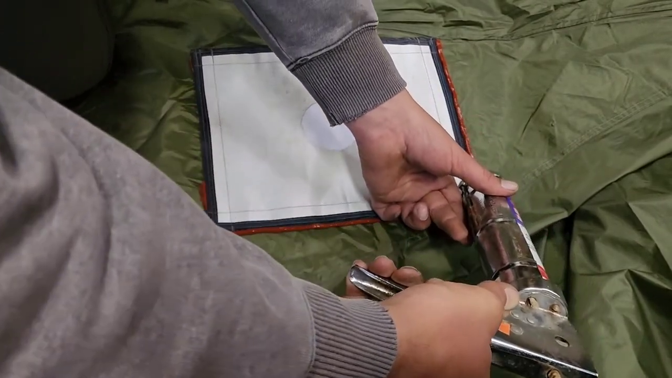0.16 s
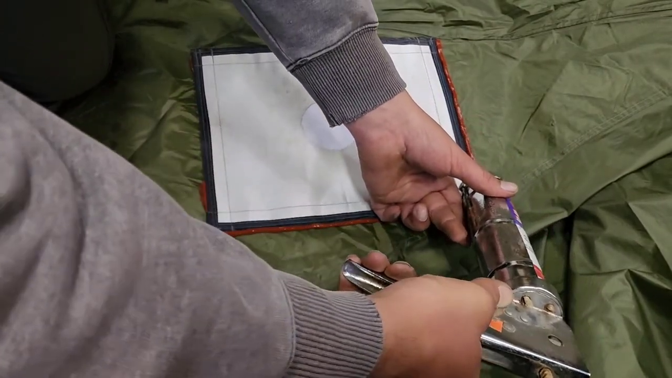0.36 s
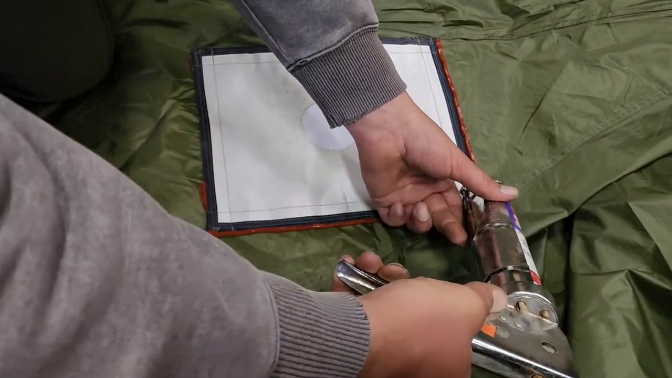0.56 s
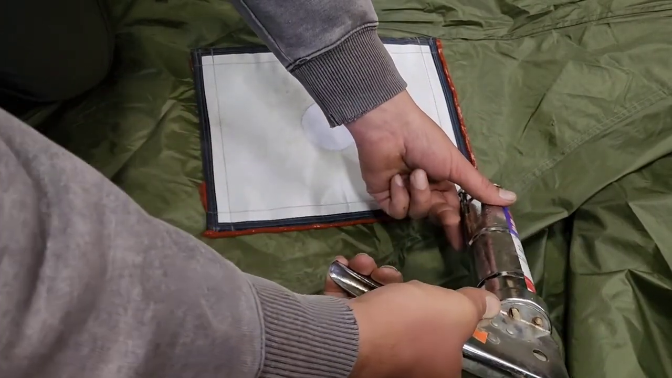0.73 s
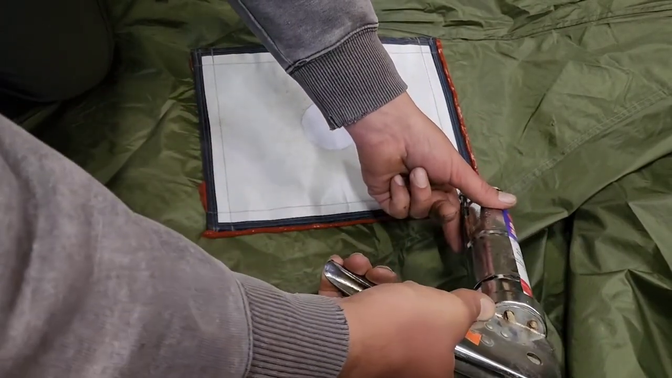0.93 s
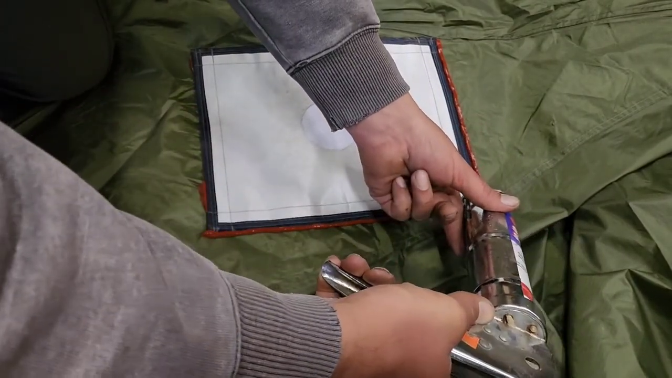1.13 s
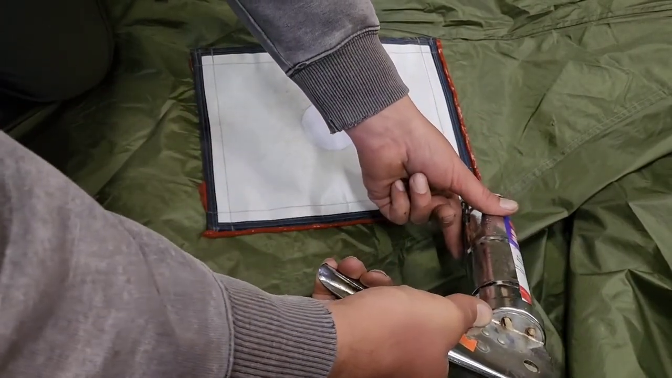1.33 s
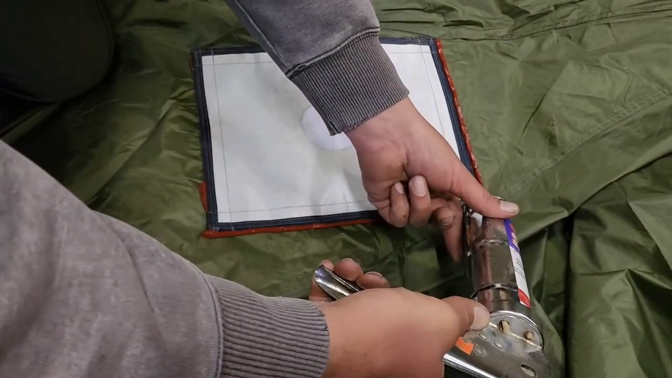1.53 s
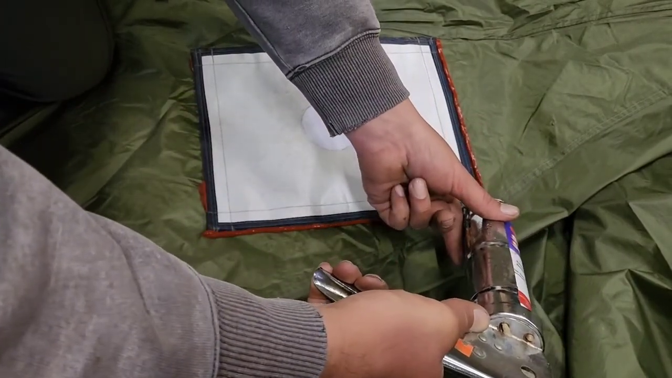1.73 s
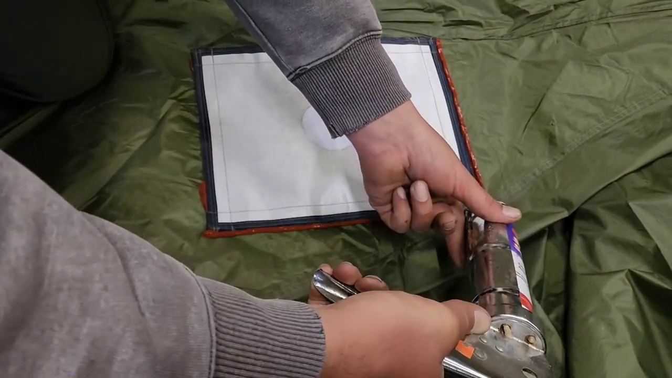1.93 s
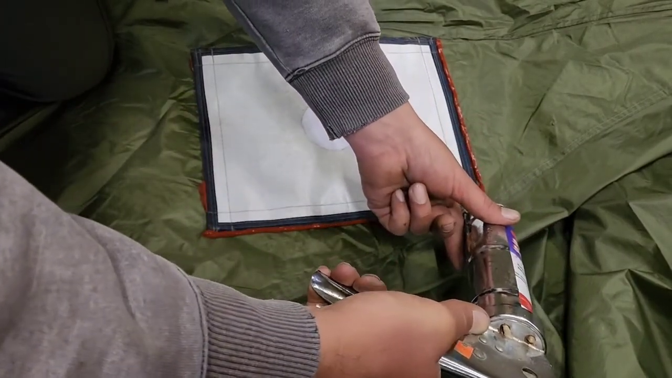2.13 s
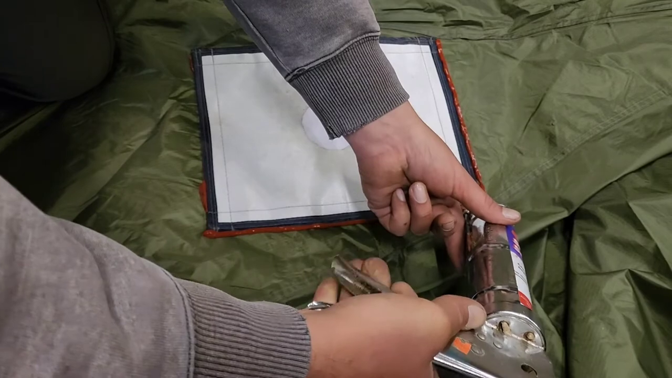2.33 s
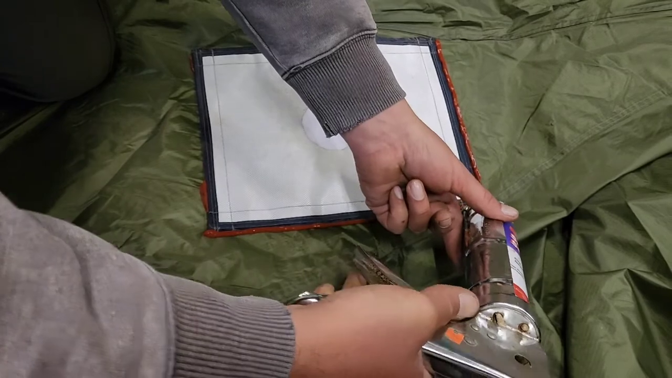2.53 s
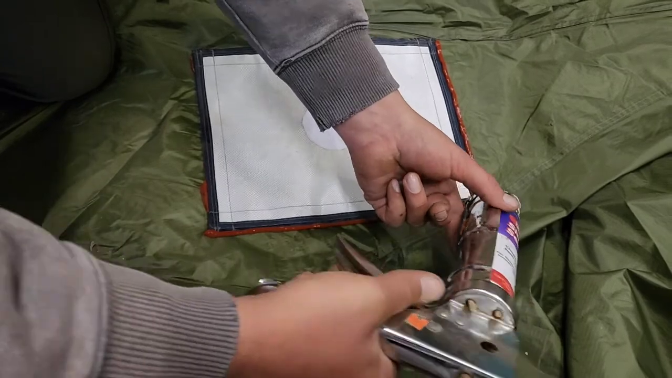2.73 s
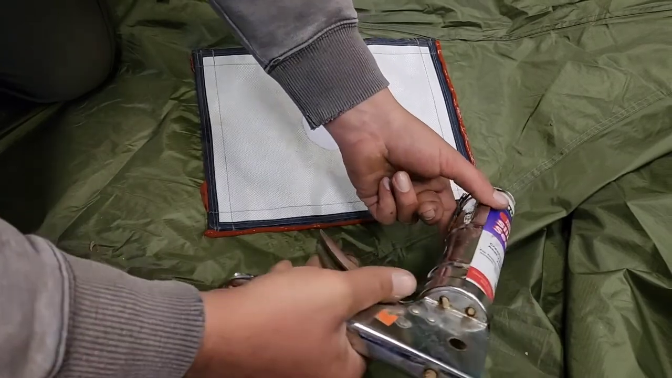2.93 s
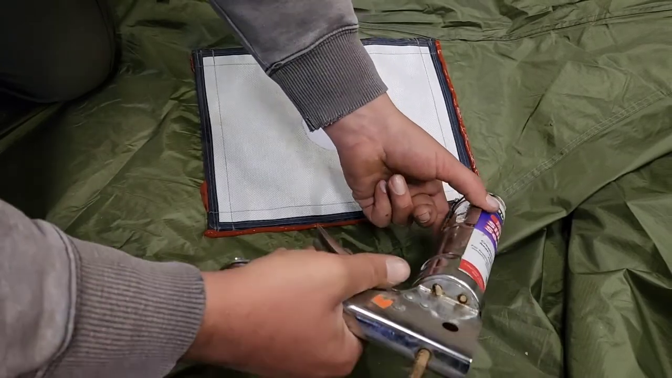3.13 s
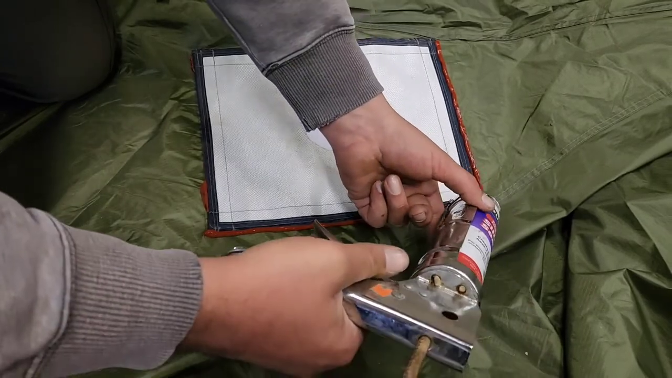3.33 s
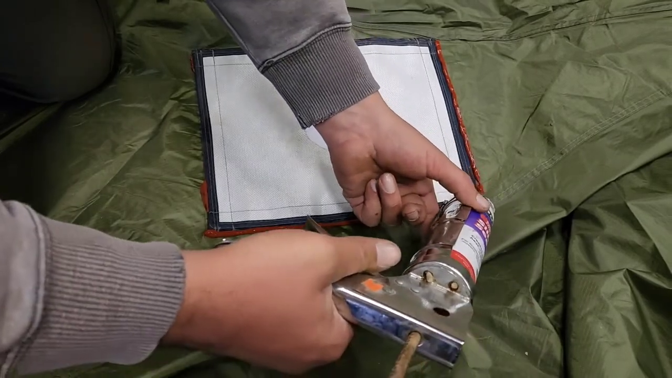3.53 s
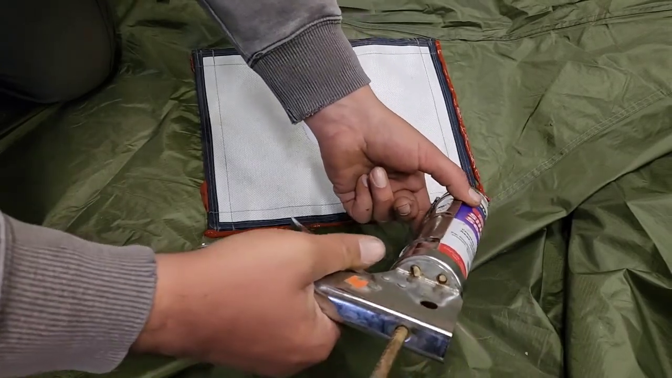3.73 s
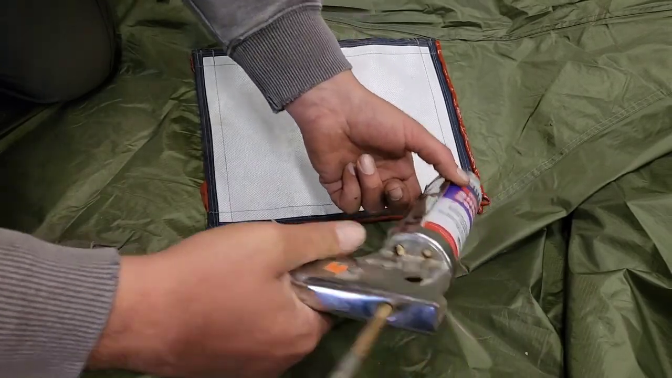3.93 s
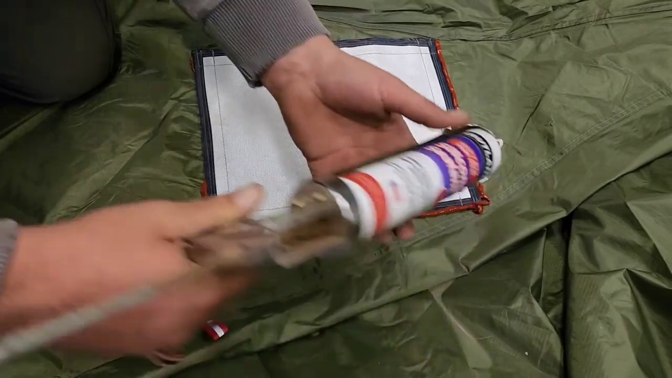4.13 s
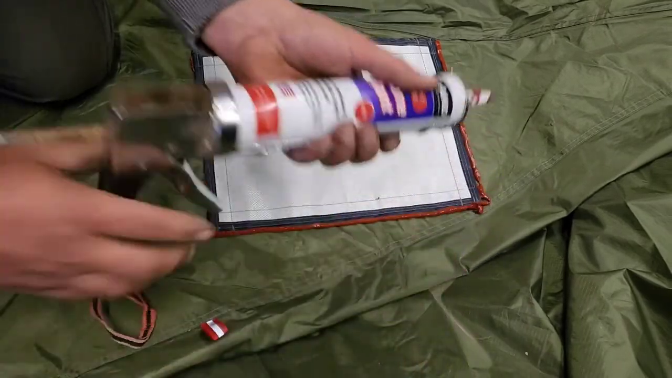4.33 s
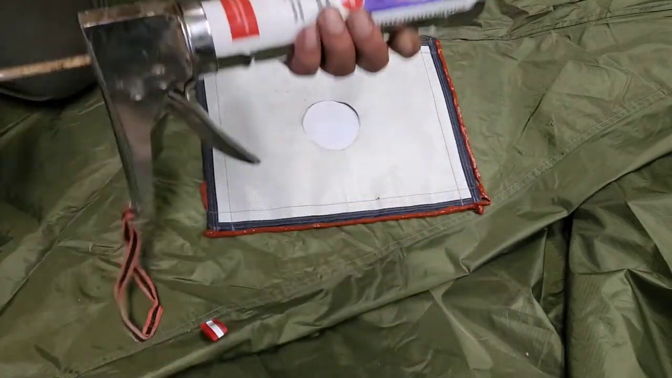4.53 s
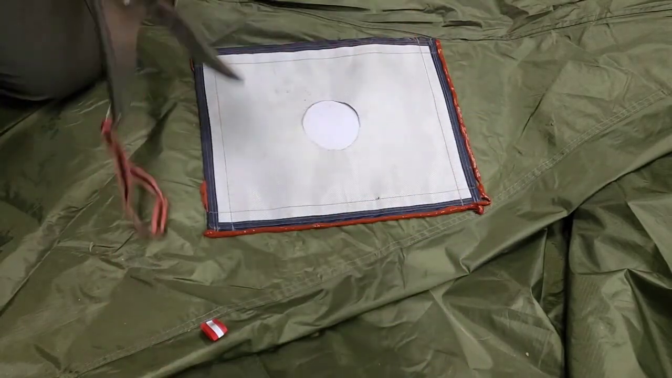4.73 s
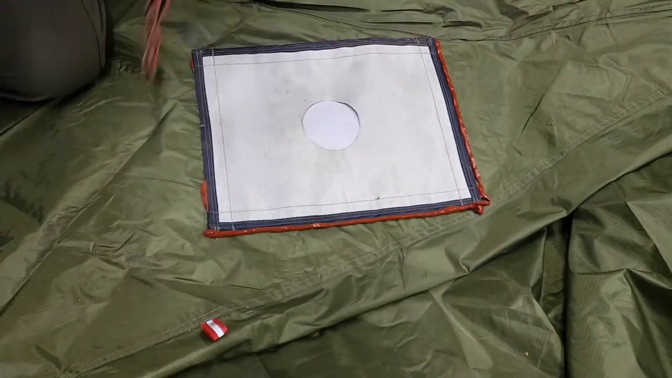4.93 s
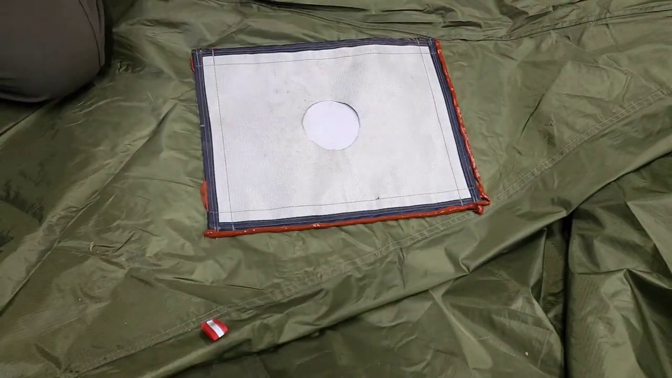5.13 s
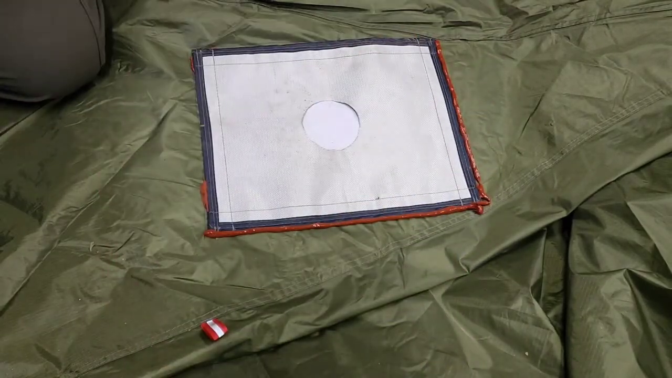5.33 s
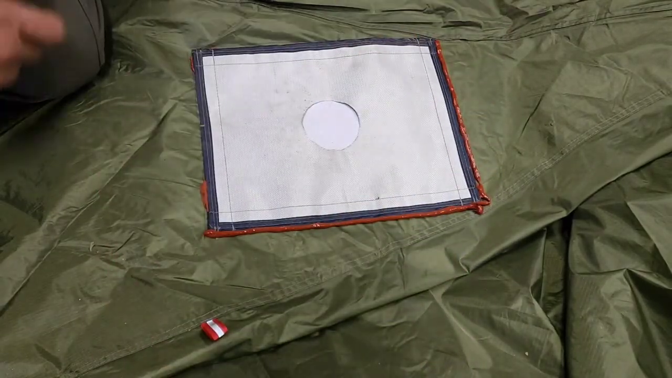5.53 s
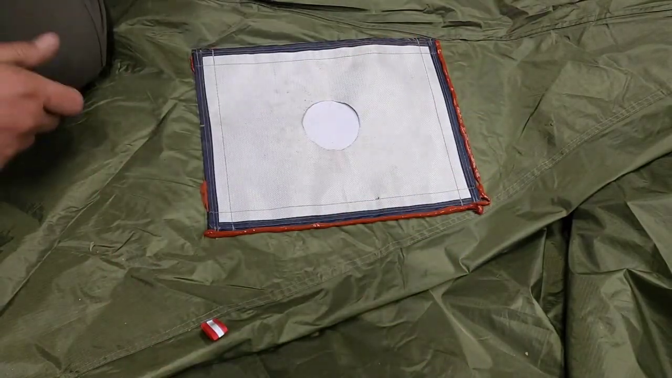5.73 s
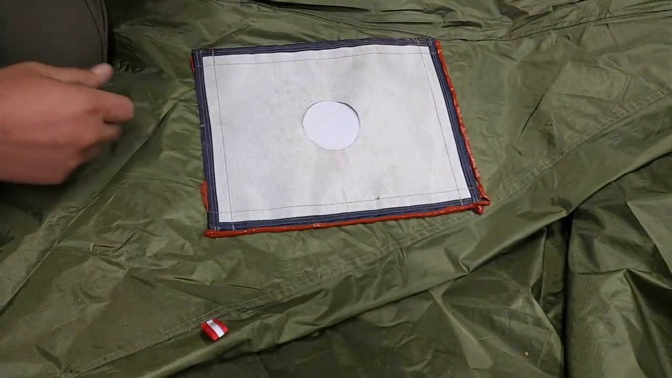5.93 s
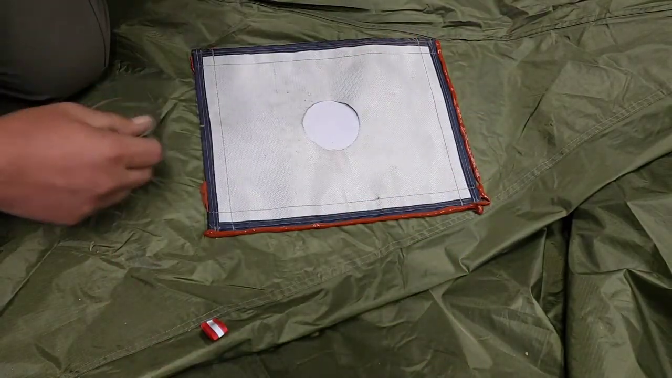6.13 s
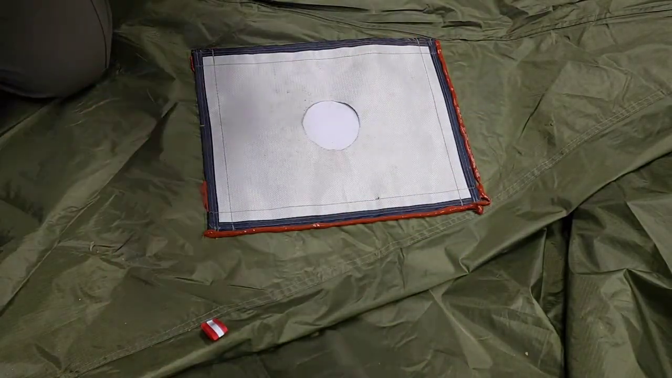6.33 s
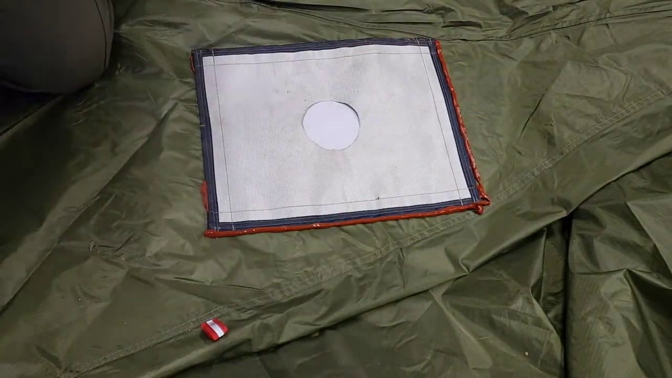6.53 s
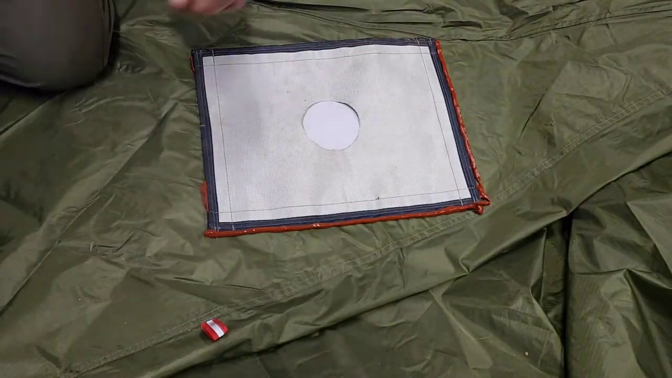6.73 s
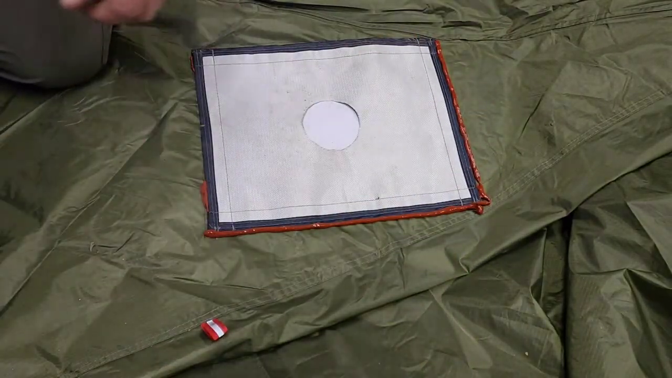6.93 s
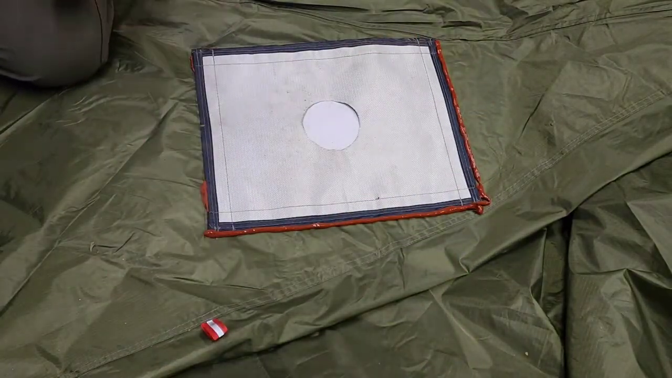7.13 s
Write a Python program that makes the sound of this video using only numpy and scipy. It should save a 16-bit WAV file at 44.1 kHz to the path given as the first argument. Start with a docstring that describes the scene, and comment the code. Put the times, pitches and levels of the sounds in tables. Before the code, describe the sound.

A constant low, slightly wavering machine hum with a faint far hiss lies under everything. From 0 to 0.8 seconds sleeves rustle and scrape lightly, with barely audible metal ticks around 0.3 to 0.5. It is then almost only hum until about 2.15, when the dragging steel plate gives a tiny creak and rising squeak, ending at 2.38 in the loudest event, a bright, dry steel snap with a short echo. Hum alone again until cloth stirs near 4.0. A hollow knock at 4.19 begins a loose run of clicks and rattles, with a ringing clank at 4.72 to 4.8, thinning by 5.1. A fabric swish comes near 5.3. Light clicks at 5.5 lead to a heavy clatter and dull thud at 5.6 to 5.7. Afterwards there are a few faint ticks, a small snap of cloth at 6.4, and soft rubbing to the end around 7.

```python
"""A steel caulking gun is worked by hand over a spread tent: trigger, plate and rod click and ring. Chattering
contacts excite the decaying modes of the steel, decaying sines add low knocks and rings, and the dragging plate
creaks and squeaks. Hard surfaces nearby give a short echo of shaped noise. Sleeves and tent cloth rustle and
scrape as grainy noise; a distant machine hums as coloured noise with one strong wavering tone and weaker ones,
over a steady hiss."""
import sys
import numpy as np
from scipy import signal
from scipy.fft import rfft, irfft
from scipy.io import wavfile

SR = 44100
rng = np.random.default_rng(int(sys.argv[2]) if len(sys.argv) > 2 else 0)


def dump_mix(stems):
    """Bounce the given channels to the path in sys.argv[1] as a 16-bit WAV at rate SR."""
    frames = np.atleast_2d(stems).T  # one column per channel
    limited = np.clip(frames, -1, 1)  # hard clip at full scale
    pcm = np.round(limited * 32767).astype(np.int16)
    wavfile.write(sys.argv[1], SR, pcm)


N = 316197  # samples

# Steel contacts: start_s, relative peak_db, frame knock_db, sizzle_db, first_part_hz, second_part_hz
# (pitches of the parts that meet), ring_db (low where the hand damps it), chatter_ms
CONTACTS = [(0.301, -64.5, 3.5, -14, 1290, 7450, -8.5, 12), (0.4915, -59, -9, 0, 7900, 5370, -2, 9.1),
            (0.5005, -57.5, -2, 4, 7440, 5370, -8, 3.2), (0.808, -71, -3, -30, 8750, 8150, 4.5, 4.7),
            (1.284, -87.5, -20, -27, 8900, 8150, 10.5, 8.2), (2.1805, -61.5, 5, 0, 1800, 7450, 0.5, 4.2),
            (2.261, -54.5, 3, 6, 2000, 7450, -9, 7.9), (2.2862, -56, 7.5, 2, 1990, 3280, 2.5, 6.7),
            (2.295, -51, -11, -1, 1910, 4515, -2, 10.4), (2.3772, -19, -4.5, 5, 1487, 2000, -10, 8.2),
            (2.3922, -37, 1.5, -15.5, 2060, 1487, -8.5, 8.2),
            (4.0504, -41.5, -15.5, 4.5, 3000, 3217, 1, 7.3), (4.135, -52.5, -16, -2, 8950, 14200, -12, 23),
            (4.1685, -47.5, -5, -0.5, 7600, 14200, -4, 8.2), (4.2615, -53.5, -5, 2, 6400, 12150, -10, 8.3),
            (4.2945, -50.5, -15, -6, 4560, 7450, -11, 6.2), (4.347, -38, -19, -2, 4910, 2960, -14, 9),
            (4.3635, -34.5, -8.5, 8, 4890, 3635, -2.5, 4.2), (4.4775, -39, -15, 8.5, 3643, 4910, -3.5, 8.2),
            (4.492, -44, -14, 6, 4840, 3635, 1.5, 14.5), (4.5177, -67, 19, -11, 1790, 1970, 0, 7.9),
            (4.548, -34.5, -13.5, 5, 7460, 3230, -8.5, 4.4), (4.561, -47.5, -11, 2, 2990, 3635, -1.5, 6),
            (4.5874, -63, -21, 19.5, 7500, 8150, 0.5, 6.3), (4.631, -53.5, -18, 4.5, 4400, 3635, -15, 11),
            (4.7226, -28.5, -6.5, -6.5, 1815, 3240, -9.5, 8.9),
            (4.763, -37, -9, 0.5, 3200, 736, -0.5, 23.5), (4.7745, -35, -2.5, -9, 2040, 1800, -13, 12.6),
            (4.7826, -42.5, 4.5, 8, 2000, 1830, -1.5, 3.8), (4.805, -49.5, -16.5, -4, 1810, 4910, 0, 12),
            (4.862, -36.5, -34, -7, 6400, 3635, -20, 4.7), (4.882, -47, -51, -6, 6470, 4400, -1, 11.3),
            (4.958, -73, -13, -20, 2970, 3280, 12, 16), (4.993, -48.5, -4, -8, 1870, 3635, -15, 11),
            (5.054, -52.5, 2, -7, 1490, 2944, -8, 11.8), (5.0868, -52, -28, -15, 6350, 7450, -8, 8.2),
            (5.464, -47, -17, -2, 6400, 7450, -14, 7.2), (5.476, -42.5, -15.5, 4, 7500, 5300, -10.5, 10.5),
            (5.505, -39.5, -15, 1, 7400, 3635, -13, 17), (5.6064, -23.5, -11, 2.5, 5470, 4770, -8, 6.3),
            (5.6158, -24, -1.5, -15, 3170, 5400, -6, 5.4), (5.633, -30.5, -7, -11, 3620, 4400, -3, 7.6),
            (5.6715, -27, -1.5, -13, 1221, 1870, -4, 6.6), (5.6957, -41, 4, -6, 5480, 1825, -6, 11),
            (5.878, -55, -4.5, 3, 1209, 7450, -17, 14), (6.011, -54, -6.5, -20.5, 5250, 2530, 1.5, 6.5),
            (6.1085, -55, -15, -0.5, 7400, 6400, -9, 5.2), (6.487, -60.5, -6.5, -13, 3635, 1990, -12, 7.6)]
# Drag of the release plate along the rod: time_s, relative level_db
PLATE_DRAG = [(2.14, -99.5), (2.175, -77), (2.2, -74), (2.25, -66.5), (2.29, -57), (2.33, -64.5),
              (2.373, -47.5), (2.39, -97.5)]
# Stereo place of the gun's body: time_s, left_minus_right_db
BODY_PAN = [(2.4, 4), (4.55, 5), (4.72, 4)]
# Coherence of diffuse sound between the two ports: frequency_hz, likeness (1 = identical)
PORT_LIKENESS = [(60, 0.96), (180, 0.98), (550, 0.49), (1650, 0.0092), (4970, 0.015), (15000, 0.012)]


def contacts():
    """Impact chatter: each contact is a swelling, decaying burst of ticks in five registers."""
    # Lead of the left port, which the gun is nearer: below and above 2.5 kHz [s]
    port_lag_s = [.0001, .00022]
    thud_db, middle_db, sizzle_pan_db = -13, -3, -2.1  # thud re knock; pan is left minus right
    registers_hz = [(300, 1000), (1250, 2360), (2600, 8430), (6000, 10000), (10500, 17500)]
    lags = np.round(np.array(port_lag_s)[[0, 0, 1, 1, 1]] * SR).astype(int)
    t = np.arange(round(.08 * SR)) / SR
    shape = (len(CONTACTS), 2, len(t))  # two rows: neighbouring registers get unrelated ticks
    ticks = rng.standard_normal(shape) * from_db(2.8 * rng.standard_normal(shape))
    bursts = []
    for tick, (start_s, peak_db, knock_db, sizzle_db, *_, chatter_ms) in zip(ticks, CONTACTS):
        length_s = chatter_ms / 1000  # time to decay by 20 dB
        swell = np.minimum(t / (0.38 * length_s), 1)
        burst = tick * swell * from_db(-20 * t / length_s)
        parts = np.array([band(band(burst[k % 2], *edges), *edges)
                          for k, edges in enumerate(registers_hz)])
        parts = parts / np.sqrt(np.sum(parts ** 2, 1, keepdims=True) / (length_s * SR / 4))
        levels_db = peak_db + np.array([knock_db + thud_db, knock_db, middle_db, middle_db, sizzle_db])
        body_pan_db = np.interp(start_s, *np.transpose(BODY_PAN))
        pans_db = np.array([body_pan_db] * 3 + [sizzle_pan_db] * 2)
        late = np.array([np.roll(part, lag) for part, lag in zip(parts, lags)])
        left = from_db(levels_db + pans_db / 2) @ parts
        right = from_db(levels_db - pans_db / 2) @ late
        bursts.append([left, right])
    return np.array(bursts)


def lay_out(bursts, gains_db):
    """Superposition: each burst is added at its moment with a gain of its own."""
    out = np.full((2, N + bursts.shape[2]), 1e-18)
    for burst, row, gain in zip(bursts, CONTACTS, from_db(gains_db)):
        at = round((row[0] - .001) * SR)  # the swell begins 1 ms ahead
        out[:, at:at + burst.shape[1]] += gain * burst
    return out[:, :N]


def evenness_db(bursts, hz):
    """Spectral evening: gain (at most 15 dB) bringing a noise burst's power at a mode to the local mean."""
    power, step_hz = np.sum(np.abs(rfft(bursts, 4096)) ** 2, 1) + 1e-20, SR / 4096
    around = power[:, int(.85 * hz / step_hz):int(1.15 * hz / step_hz)].mean(1)
    return np.minimum(10 * np.log10(around / power[:, round(hz / step_hz)]), 15)


def steel(bursts):
    """Modal synthesis: chatter and stick-slip drag drive a bank of damped two-pole resonators."""
    # Modes of the steel frame and rod: frequency_hz, relative level_db, t60_s (held to 0.01 or more)
    steel_modes = [(517, -14.5, 0.087), (734, -5, 0.22), (1179, 2.5, 0.036), (1265, -7, 0.11),
                   (1478, -15.5, 0.12), (1797, -20, 0.17), (2040, -11.5, 0.054), (2500, -16.5, 0.11),
                   (3012, -8.5, .05), (3101, -9.5, .04), (3647, -13, 0.055), (4400, -17, 0.05),
                   (5000, -9, 0.06), (5370, -10, 0.048), (6447, -8.5, 0.071), (7450, -9, 0.03),
                   (7990, -3, 0.014), (8850, -6, 0.0079), (11900, -11, 0.052), (12900, -12.5, 0.036),
                   (13700, -14.5, 0.05), (15300, -9.5, 0.044), (15200, -9.5, .06)]
    ring_level_db, drag_ring_db = -1, -3
    mode_spread_db = 2  # random spread of each mode's share from contact to contact
    near_boost_db, near_octaves = 12.5, 0.05  # modes close to the parts struck ring loudest
    ring_db, struck_hz = np.array(CONTACTS)[:, 6], np.array(CONTACTS)[:, 4:6]
    slips = rng.standard_normal((2, N)) * from_db(in_time(PLATE_DRAG)[0] + 0.87 * drift(120))
    slips = band(slips, 1800, 5300)
    out = 0
    for k, (hz, level_db, t60_s) in enumerate(steel_modes):
        r, w = from_db(-60 / (max(t60_s, .01) * SR)), 2 * np.pi * hz / SR  # pole radius and angle
        octaves_off = np.log2(struck_hz / hz)
        near_db = near_boost_db * np.exp(-(octaves_off / near_octaves) ** 2).max(axis=1)
        share_db = mode_spread_db * rng.standard_normal(len(CONTACTS))
        gains_db = level_db + ring_db + near_db + evenness_db(bursts, hz) + share_db
        drive = lay_out(bursts, gains_db) + from_db(level_db + drag_ring_db) * slips
        mode = signal.lfilter([0, 0.04 * np.sin(w)], [1, -2 * r * np.cos(w), r * r], drive)
        out = out + (-1) ** k * mode  # alternate polarity
    return from_db(ring_level_db) * out


def creak(rough_db=2.5):
    """Stick-slip friction: the dragging plate gives a broad noise creak and a rising squeak."""
    creak_db, squeak_db = -2, -9  # against the drag level
    squeak_hz, squeak_rise_hz_per_s = 2840, 3200
    elapsed_s = np.clip(np.arange(N) / SR - PLATE_DRAG[1][0], 0, .3)
    broad = rms_one(band(band(rng.standard_normal(N), 1100, 2100), 1100, 2100))
    phase = 2 * np.pi * np.cumsum(squeak_hz + squeak_rise_hz_per_s * elapsed_s) / SR
    squeak = np.minimum(elapsed_s / 0.17, 1) * drift(65) * np.sin(phase)
    slips = from_db(in_time(PLATE_DRAG)[0] + rough_db * drift(40))
    pan = from_db([[BODY_PAN[0][1] / 2], [-BODY_PAN[0][1] / 2]])
    return slips * (from_db(creak_db) * broad + from_db(squeak_db) * squeak) * pan


def knocks():
    """Damped oscillation: each knock or low ring is one exponentially decaying sine."""
    # Low knocks, and low rings of the struck gun: start_s, relative peak_db, pitch_hz,
    # cycles (to fall 60 dB; the sound ends after 0.1 s at the latest)
    blows = [(2.379, -39, 760, 20), (4.1889, -26.5, 906, 9.5), (4.364, -43.5, 1293, 74),
             (4.478, -48.5, 1320, 72), (4.5177, -42, 627, 13), (4.7226, -40, 783, 55),
             (4.769, -33, 758, 52), (4.747, -43, 510, 72), (4.766, -38, 503.5, 103),
             (4.995, -45.5, 733, 39), (5.608, -34.5, 670, 14), (5.675, -23.5, 416, 5),
             (5.691, -30.5, 262, 8), (5.712, -38, 191, 17)]
    out, t = np.zeros(N), np.arange(SR // 10) / SR
    for start_s, peak_db, hz, cycles in blows:
        at = round(start_s * SR)
        decay = from_db(peak_db - 60 * t * hz / cycles)
        out[at:at + len(t)] += decay * np.sin(2 * np.pi * hz * t)
    return out


def echo(x):
    """Diffuse reverberation: convolution with noise, unrelated at the ports, decaying band by band."""
    # Reverberation time of the surroundings: frequency_hz, t60_s
    reverb_time = [(400, 0.42), (1500, 0.33), (5000, 0.37), (12000, 0.22)]
    t, edges = np.arange(SR // 2) / SR, np.geomspace(200, 18000, 9)
    white = rng.standard_normal((2, 2, len(t)))
    tail = 0
    for k, (low, high) in enumerate(zip(edges, edges[1:])):
        decay = from_db(-60 * t / at_hz(reverb_time, np.sqrt(low * high)))
        tail = tail + band(white[k % 2], low, high) * decay
    tail = tail * np.clip(t / 0.006 - .5, 0, 1)  # builds up between 3 and 9 ms
    return signal.fftconvolve(x, tail / np.sqrt(np.sum(tail ** 2) / 2), axes=1)[:, :N]


def microphone(x):
    """Port resonance: a cascade of second-order peaks and dips colours close sounds."""
    # Peaks and dips of the ports: frequency_hz, width_hz, gain_db
    port_peaks = [(6020, 1600, 1), (9210, 1100, -11), (11200, 9300, 12.5), (2857, 1920, 10.5)]
    for hz, width_hz, gain_db in port_peaks:
        w, g = 2 * np.pi * hz / SR, from_db(gain_db / 2)
        a = np.pi * width_hz / SR
        x = signal.lfilter([1 + a * g, -2 * np.cos(w), 1 - a * g],
                           [1 + a / g, -2 * np.cos(w), 1 - a / g], x)
    return x


def rubbing_levels(drag_hiss_db=3.5, drag_depth_db=-1.5):
    """Power addition: steady rubbing, swishes and the plate's dry hiss; gains above and below the split."""
    # Swishes of sleeve and cloth: start_s, hold_s, relative level_db,
    # depth_db (low band against high, capped at 8)
    swishes = [(0.015, 0.13, -73.5, -2), (0.156, 0.16, -71.5, 7.5), (0.428, 0.025, -60, 3),
               (0.463, 0.045, -57, -3), (0.587, 0.054, -65.5, -4), (0.655, 0.038, -73.5, 4),
               (0.77, 0.21, -86, 15), (2.62, 0.23, -85.5, 11.5), (3.966, 0.056, -65, -7),
               (4.016, 0.043, -59.5, 2), (4.148, 0.043, -57, 2), (4.684, 0.18, -56.5, 8.5),
               (5.003, 0.038, -59.5, 10), (5.13, 0.15, -67, 10), (5.276, 0.094, -53.5, -3.5),
               (5.93, 0.023, -71, -7), (6.402, 0.014, -54.5, -4)]
    # Steady rubbing, stronger once the gun is lifted and the hands move on: time_s,
    # relative level_db, depth_db (as above)
    rubbing = [(0, -100, -3), (3.86, -98, -2), (3.96, -64, -6), (4.4, -70.5, 8), (4.9, -67, 16),
               (5.3, -72.5, 10), (5.6, -62.5, 14.5), (6.2, -67.5, 6), (6.4, -61, 7), (6.7, -63, 5.5),
               (6.92, -67, 3.5), (7.17, -63, 0.5)]
    rise_db_per_s, fall_db_per_s = 348, 446
    t = np.arange(N) / SR
    layers = [in_time(rubbing), (in_time(PLATE_DRAG)[0] + drag_hiss_db, drag_depth_db)]
    for start_s, hold_s, peak_db, depth_db in swishes:
        rise_db = rise_db_per_s * np.maximum(start_s - t, 0)
        fall_db = fall_db_per_s * np.maximum(t - start_s - hold_s, 0)
        layers.append((peak_db - rise_db - fall_db, depth_db))
    high = sum(from_db(2 * level) for level, _ in layers)
    low = sum(from_db(2 * (level + np.minimum(depth, 8))) for level, depth in layers)
    return np.sqrt(high), np.sqrt(low)


def rustle(grain_db=1.5, patchy_db=0.7, own_db=2.2, snap_db=1.5, split_hz=3200):
    """Fibre friction: noise in uneven grains and snaps, each register swelling and thinning on its own."""
    # Spectrum of rubbed cloth: frequency_hz, relative density_db (per Hz)
    cloth_spectrum = [(530, -31.5), (900, -8), (1050, -8), (1610, -7), (2500, -13.5), (3600, -13),
                      (5600, -10.5), (7410, -3.5), (9330, -14), (12300, -5.5), (15000, -2.5), (16300, -15)]
    high_gain, low_gain = rubbing_levels()
    snaps_db = snap_db * np.repeat(rng.exponential(1, N // 40 + 1), 40)[:N]  # same at both ports
    grains = rng.standard_normal((2, N))
    grains = grains * from_db(grain_db * drift(150) + patchy_db * drift(13.0) + snaps_db)
    coloured, edges = shaped(grains, cloth_spectrum), np.geomspace(500, 18000, 9)
    cloth = 0
    for k in range(8):
        cloth = cloth + (-1) ** k * from_db(own_db * drift(20.0)) * band(coloured, *edges[k:k + 2])
    cloth = rms_one(cloth)
    low = signal.sosfilt(signal.butter(4, split_hz, "low", fs=SR, output="sos"), cloth)
    high = signal.sosfilt(signal.butter(4, split_hz, "high", fs=SR, output="sos"), cloth)
    return high_gain * high + low_gain * low


def scrapes():
    """Resonant friction: grainy noise in one narrow band swells and fades."""
    # Low scrapes of a sleeve on stretched cloth: start_s, length_s, level_db (before the fade),
    # reference_hz (the band spans 0.92 to 0.96 of it)
    sleeve_scrapes = [(0.412, 0.073, -60.5, 1290), (6.309, 0.2, -64, 1480)]
    out = np.zeros((2, N))
    for start_s, length_s, level_db, hz in sleeve_scrapes:
        at, count = round(start_s * SR), round(length_s * SR)
        grains = rng.standard_normal((2, count)) * from_db(3.0 * drift(90)[:count])
        scrape = rms_one(band(grains, 0.92 * hz, 0.96 * hz))
        out[:, at:at + count] += from_db(level_db) * scrape * np.hanning(count)
    return out


def hum():
    """Partially coherent noise: rumble and a steady hiss, with tones wavering in pitch and level."""
    # Spectrum of the rumble: frequency_hz, relative density_db (per Hz)
    rumble_spectrum = [(13, -54.5), (22, -28), (91, -8.5), (123, -4.5), (157, -7), (186, -9.5), (213, -13),
                       (310, -19.5), (370, -16.5), (444, -30), (657, -28.5), (766, -33.5), (940, -32),
                       (1300, -43), (1690, -73), (2860, -120)]
    # Spectrum of the steady hiss: frequency_hz, relative density_db (per Hz)
    hiss_spectrum = [(710, -45.5), (1200, -7), (1440, -1.5), (1920, -7.5), (2090, -8), (2660, -15.5),
                     (3800, -20), (7930, -23.5), (8750, -31), (16300, -38)]
    # Tones of the machine: frequency_hz, rms level_db, waver_db (spread), breadth_hz (spread)
    tones = [(185.1, -52, 1, 1.3), (312.2, -65, 4.5, 6), (475.7, -73, 2.5, 3.5), (645.4, -72, 3, 2.6),
             (3750, -92.5, 1.9, 8.6)]
    rumble_db, hiss_db = -51, -79
    out = from_db(rumble_db) * shaped(rng.standard_normal((2, N)), rumble_spectrum)
    out = out + from_db(hiss_db) * shaped(rng.standard_normal((2, N)), hiss_spectrum)
    for hz, level_db, waver_db, breadth_hz in tones:
        phase = 2 * np.pi * np.cumsum(hz + breadth_hz * drift(6.0)) / SR
        apart = np.arccos(np.clip(at_hz(PORT_LIKENESS, hz), -1, 1))  # phase gap between the ports
        gain = np.sqrt(2) * from_db(level_db + waver_db * drift(7.2))
        out = out + gain * np.sin(phase + np.array([[0], [apart]]))
    return out


def shaped(white, spectrum):
    """Spectral shaping: coloured noise of rms 1 whose ports share the bass and part in the treble."""
    hz = np.fft.rfftfreq(N, 1 / SR) + 1
    alike = np.clip(at_hz(PORT_LIKENESS, hz), -1, 1)
    mid, side = rfft(white) * from_db(at_hz(spectrum, hz))
    ports = np.sqrt(1 + alike) * mid + np.sqrt(1 - alike) * side * [[1], [-1]]
    return rms_one(irfft(ports, N))


def drift(rate_hz):
    """Low-passed chance: coarse noise through two equal one-poles, scaled to spread 1."""
    r = np.exp(-80 * np.pi * rate_hz / SR)  # one coarse step is 40 samples
    slow = signal.lfilter([1], [1, -2 * r, r * r], rng.standard_normal(N // 40 + 2002))[2000:]
    return np.interp(np.arange(N) / 40, np.arange(len(slow)), rms_one(slow))


def band(x, low_hz, high_hz):
    """Band limiting: Butterworth band-pass."""
    edges = [low_hz, min(high_hz, .45 * SR)]
    return signal.sosfilt(signal.butter(2, edges, "band", fs=SR, output="sos"), x)


def at_hz(points, hz):
    """Logarithmic pitch: read a spectrum on a log-frequency axis."""
    return np.interp(np.log(hz), np.log(np.array(points)[:, 0]), np.array(points)[:, 1])


def in_time(rows):
    """Linear interpolation: each column of a curve table, sample by sample."""
    times_s, *columns = np.transpose(rows)
    return [np.interp(np.arange(N) / SR, times_s, column) for column in columns]


def rms_one(x):
    """Power normalization: scale to unit rms."""
    return x / np.sqrt(np.mean(x ** 2) + 1e-20)


def from_db(db):
    """Logarithmic level: decibels to amplitude gain."""
    return 10 ** (np.asarray(db) / 20)


def scene():
    """Superposition of the gun with its echo, the cloth and the hum."""
    crack_db, crack_echo_db = -4, -5.5  # direct crack of the contacts; share the walls throw back
    echo_db, knock_echo_db = -13.5, 3.5  # echo of the ringing; that of the knocks against it
    bursts, knock = contacts(), knocks()
    ringing = steel(bursts) + creak()
    crack = lay_out(bursts, np.full(len(CONTACTS), crack_db))
    thrown = from_db(echo_db) * (ringing + from_db(knock_echo_db) * knock)
    thrown = thrown + from_db(crack_echo_db) * crack
    close = microphone(crack + ringing + knock + echo(thrown))
    return close + rustle() + scrapes() + hum()


def record(dry):
    """Band limitation: a steep low-pass removes the top, 80 dB down from 16.8 kHz."""
    return signal.sosfilt(signal.cheby2(14, 80, 16800, fs=SR, output="sos"), dry)


dry = scene()
out = record(dry)
dump_mix(out)
```